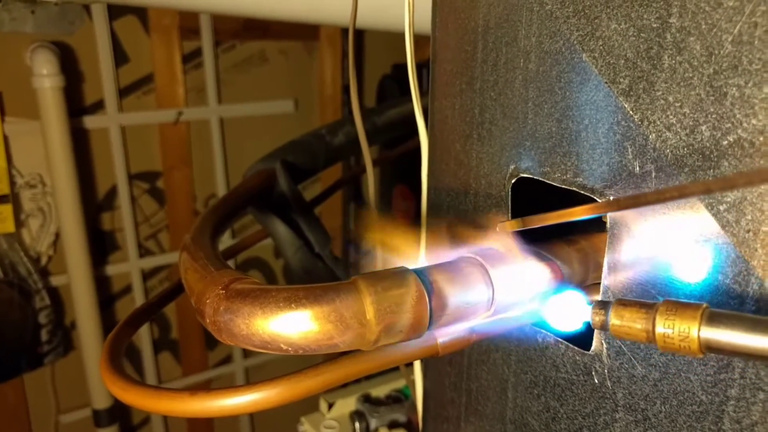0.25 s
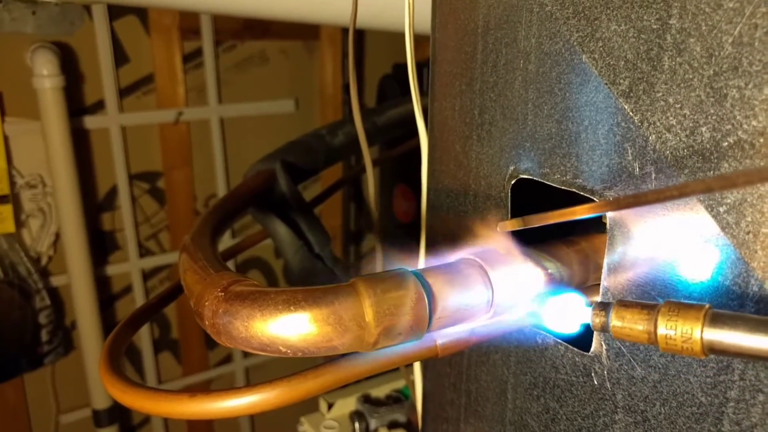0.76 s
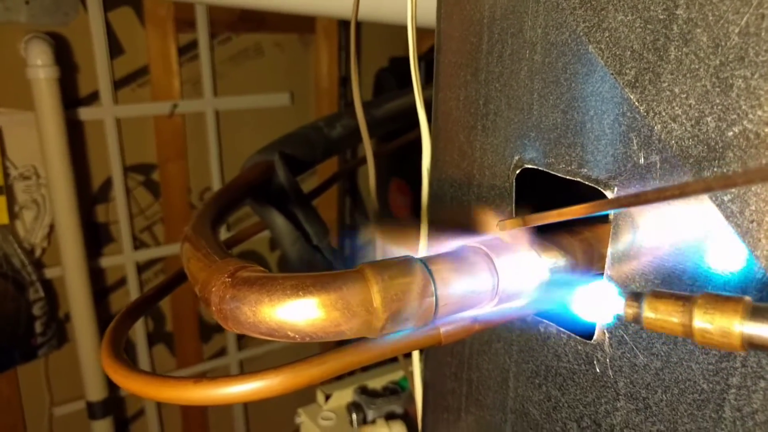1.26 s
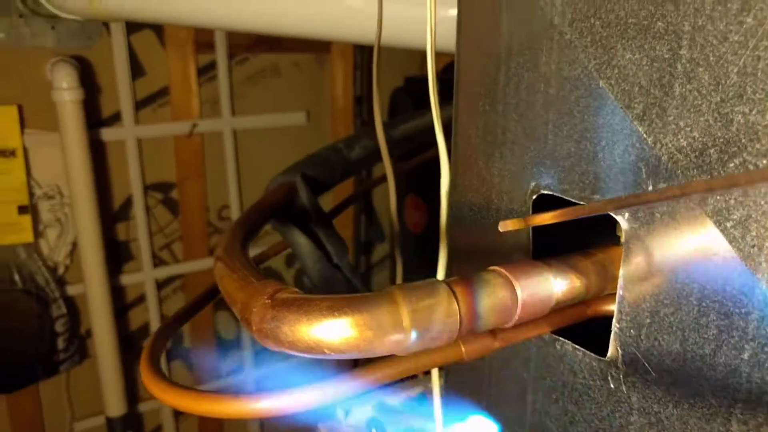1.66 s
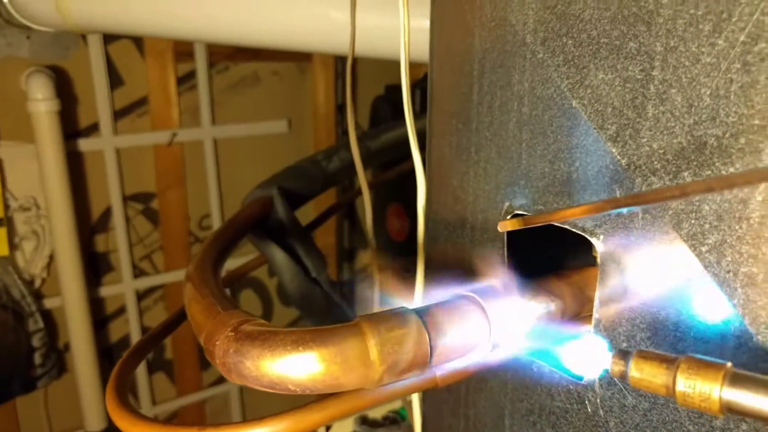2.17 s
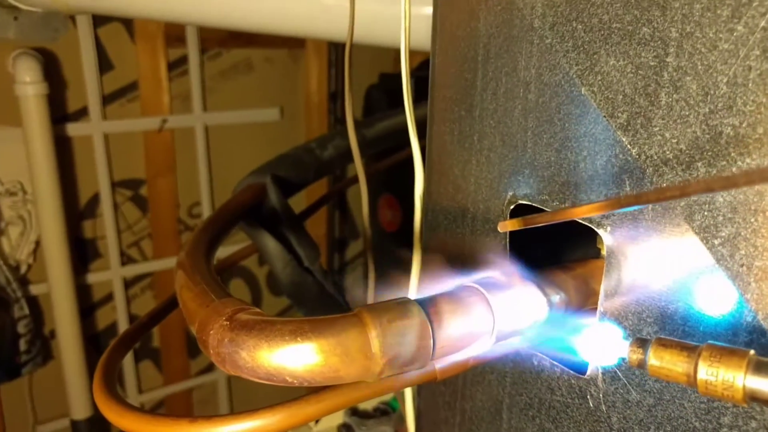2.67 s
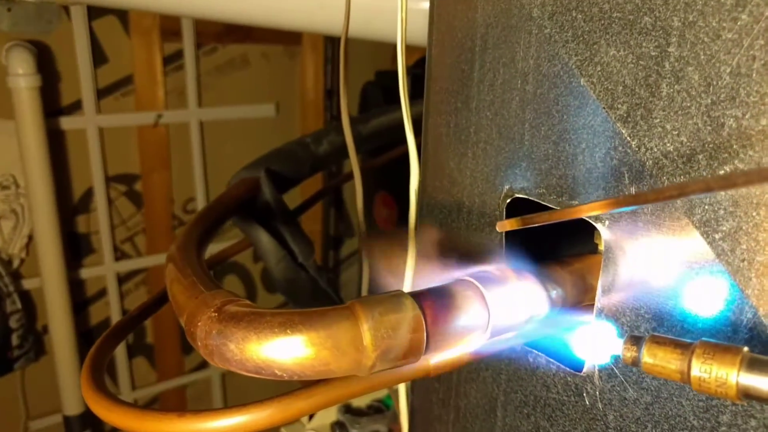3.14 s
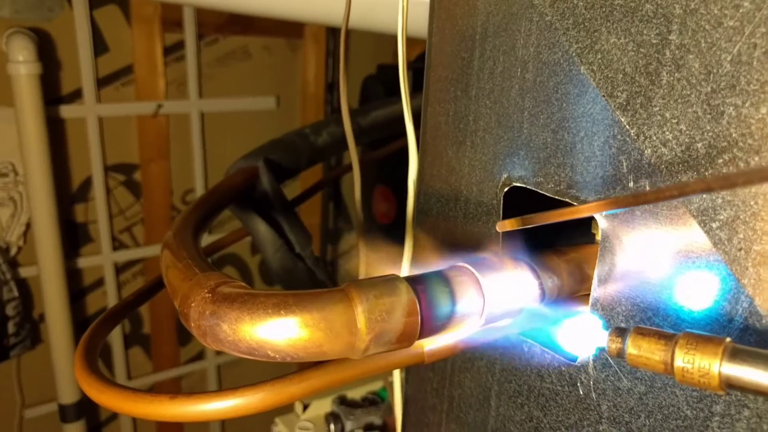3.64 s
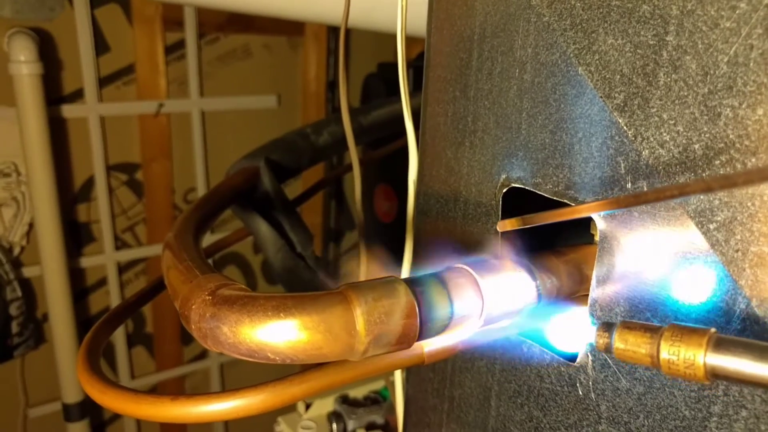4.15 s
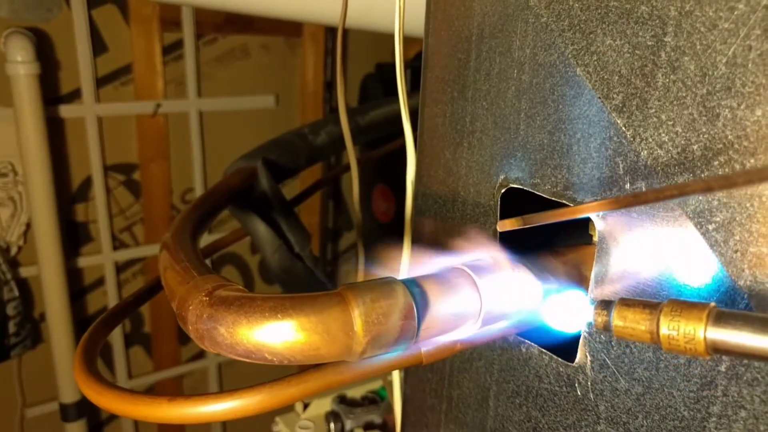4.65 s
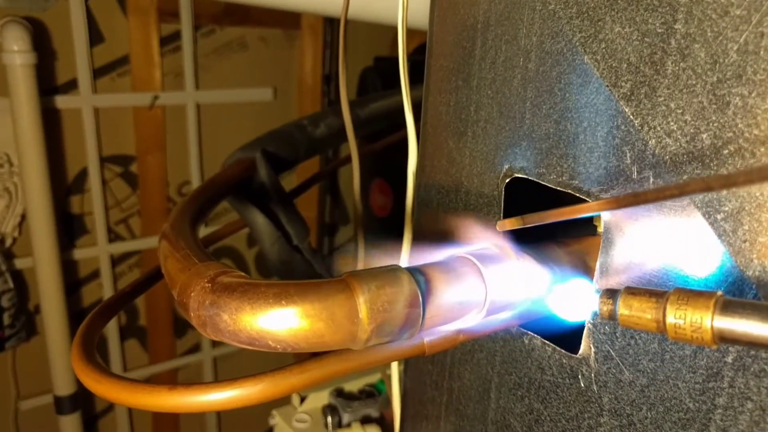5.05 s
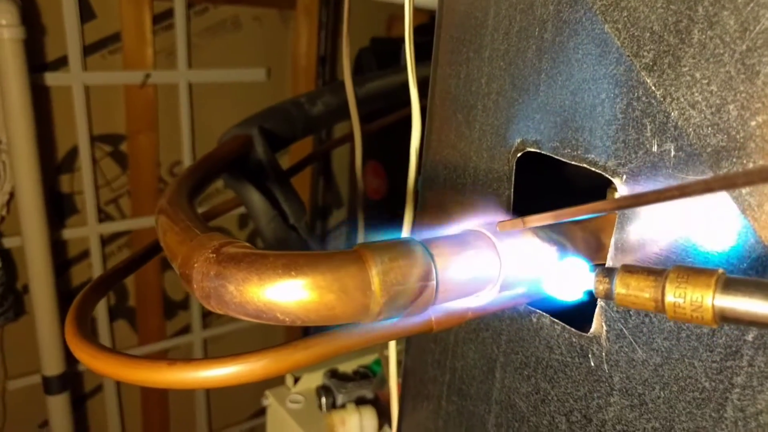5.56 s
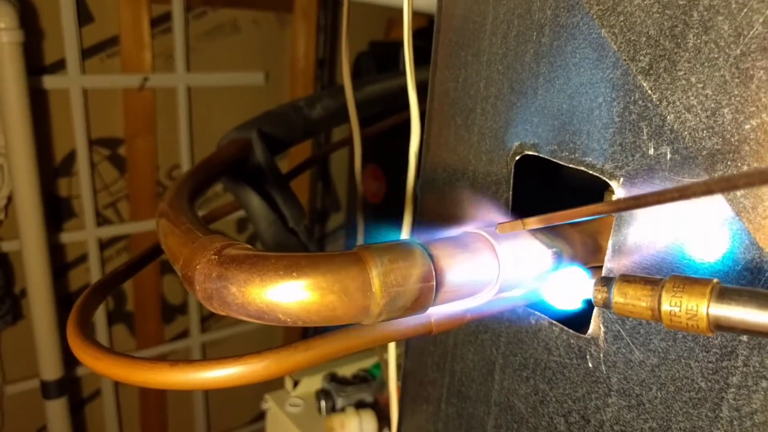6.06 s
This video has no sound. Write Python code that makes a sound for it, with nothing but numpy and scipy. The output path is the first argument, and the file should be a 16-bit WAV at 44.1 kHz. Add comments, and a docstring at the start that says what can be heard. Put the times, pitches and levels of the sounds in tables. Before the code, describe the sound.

A brazing torch burns against a copper pipe joint in front of a sheet-metal cabinet, heard close up with very little room echo. From the start, the gas jet gives a bright, steady hiss with a breathy high whistle that wavers slightly in pitch. A softer, hollow flame roar lies underneath and a thin sizzle sits on top. At about 1.4 seconds the torch swings away with a quick whoosh; the roar turns duller and the whistle briefly grows stronger. Near 1.9 seconds it whooshes back, and the movement sweeps a hollow, swirling tone through the hiss. The flame then stays on the joint. A few faint low puffs occur between about 1.5 and 5.7 seconds. The thin sizzle fades just after 5 seconds, while the hiss, whistle and roar carry on to the end at about 6.3 seconds.

```python
"""A brazing torch heats a copper joint in front of a sheet-metal cabinet, heard close up in mono.
From the start the gas jet hisses, its mixer whistles unsteadily and the flame roars on the pipe.
Near 1.4 s the torch swings away with a whoosh, near 1.9 s it whooshes back: the echoes off the metal
lengthen and shorten, sweeping hollows through the hiss. The flame then stays on the joint, with a few
soft low puffs, and a thin high sizzle fades out just after 5 s."""
import sys
import numpy as np
from scipy import signal
from scipy.fft import rfft, irfft, next_fast_len
from scipy.io import wavfile
from scipy.ndimage import uniform_filter1d, map_coordinates

SR = 44100
rng = np.random.default_rng(int(sys.argv[2]) if len(sys.argv) > 2 else 0)


def inscribe(sig):
    """Save sig as 16-bit PCM at rate SR to the path in sys.argv[1].

    A 1-D sig is mono; a 2-D sig holds one channel per row.
    Samples are clipped to [-1, 1] before scaling.
    """
    pcm = np.round(np.clip(np.atleast_2d(sig).T, -1, 1) * 32767)
    wavfile.write(sys.argv[1], SR, pcm.astype(np.int16))


N = 278271

# the room's decay: f/Hz, T60/s
ROOM_DECAY = [(200, 0.48), (2000, 0.071), (12000, 0.037)]
# the two nearest echoes as the torch moves: t/s, then delay/ms and relative strength of each
NEAR_ECHOES = [(0, 0.15, 0.32, .415, 0.18), (.8, 0.17, 0.49, 0.41, .2), (1.3, 0.17, 0.46, 0.4, 0.17),
               (1.35, .18, .42, .435, .28), (1.45, 0.25, .5, .48, 0.3), (1.55, 0.36, 0.3, 0.54, .22),
               (1.62, 0.4, 0.35, .6, 0.2), (1.74, 0.37, 0.24, 0.57, 0.2), (1.82, 0.28, 0.36, .52, .15),
               (1.88, 0.22, .42, .42, 0.3), (1.95, 0.18, 0.34, 0.43, 0.2), (2.08, .17, 0.2, 0.38, .24),
               (2.25, .15, 0.34, 0.38, 0.17), (3.3, 0.14, 0.31, .39, .07), (3.9, 0.15, 0.33, 0.43, 0.17),
               (4.5, .16, 0.49, 0.4, 0.2), (5.18, 0.16, 0.51, 0.41, 0.12), (5.3, 0.18, 0.64, 0.44, 0.3),
               (6.31, 0.18, 0.62, 0.45, 0.24)]
# farther echoes: delay before the swing/ms, delay after it/ms, change when away/ms, relative strength
FAR_ECHOES = [(.885, .58, .165, .1), (1.452, 1.452, -.17, .12), (1.81, 1.81, .15, .06)]
# soft low puffs: t/s, relative level/dB
LOW_PUFFS = [(1.489, -35), (2.359, -42), (3.108, -46), (3.449, -40), (3.79, -44), (4.749, -43),
             (5.718, -49)]
# resonances of the hollow cabinet: f/Hz, width/Hz, relative level/dB
CABINET_MODES = [(321, 100, -12), (400.4, 30.5, -6), (552, 18, -9.5), (640, 72, -7.5), (840, 380, -14.5),
                 (1060, 120, -8.5), (1423, 84, -7.5), (1530, 32, -18), (1657, 183, -7.5), (2000, 33, -14),
                 (2260, 23, -5), (3140, 148, 0.5)]
# tone colour of the flame: f/Hz, relative level/dB
FLAME_SPECTRUM = [(25, -31), (60, -13), (100, -9.5), (150, -13.5), (250, -4), (400, -2), (1000, 0),
                  (2000, 2.5), (3100, -3.5), (3600, -38)]
# envelope of the flame's roar: t/s, level/dB
ROAR_ENVELOPE = [(0, -28.5), (1.1, -29.5), (1.4, -26), (1.8, -29), (2, -27), (4, -28.5), (6.31, -30)]
# thin sizzle within the hiss: t/s, centre f/Hz, level/dB
SIZZLE_PATH = [(0, 9800, -28), (1.2, 9200, -39), (1.95, 10000, -38), (2.15, 10300, -30.5),
               (3.25, 10350, -27.5), (3.5, 10180, -33), (3.65, 9640, -28), (5, 9600, -36), (5.3, 9640, -55)]
# whooshes as the torch leaves and returns: peak t/s, level/dB, rise/(dB/s), fall/(dB/s)
WHOOSHES = [(1.43, -16, 160, 167), (1.88, -19.5, 140, 25)]
# the mixer's whistle: t/s, f/Hz, level/dB
WHISTLE_PATH = [(0, 2716, -17), (1.26, 2735, -20), (1.35, 2670, -18), (1.41, 2640, -30),
                (1.46, 2620, -16.5), (1.53, 2780, -14.5), (1.67, 2750, -17.5), (1.77, 2745, -13),
                (1.93, 2752, -24.5), (1.97, 2790, -20), (2.2, 2816, -18), (2.4, 2704, -19.5),
                (3.2, 2710, -18), (3.45, 2604, -18), (3.75, 2662, -17.5), (4.1, 2630, -18),
                (4.94, 2688, -19), (5.08, 2736, -17.5), (5.33, 2660, -20), (5.7, 2617, -19),
                (6.31, 2598, -20.5)]
# tone colour of the gas jet: f/Hz, relative level/dB
JET_SPECTRUM = [(1500, -35.5), (2000, -10), (2300, 4.5), (3100, 4), (3600, -3), (4150, 1.5), (5000, -2.5),
                (5500, 1), (5900, -0.5), (6800, 0), (8700, -5.5), (9100, -5.5), (11000, -8.5),
                (15000, -10.5), (15800, -8.5)]
# the hiss as the nozzle's aim changes: t/s, base level/dB, tilt/(dB/octave), amount of treble beam
NOZZLE_AIM = [(0, -14, 2.5, -1.5), (.8, -14, 2.5, -0.5), (1.15, -14.5, 0, 0), (1.3, -15.5, 1.5, 6),
              (1.42, -15, 1, 8), (1.6, -17, 0, 5), (1.84, -17.5, 0.8, 6), (1.97, -13.5, 3, -3),
              (2.15, -15, 2.5, 2), (2.4, -15.5, .5, 6.5), (3.2, -15.5, 1, 3.5), (3.7, -14.5, 2, 0),
              (4.5, -14.5, 0.5, 1.5), (5.15, -14.5, 0.9, -0.5), (5.6, -15, -0.2, 4.5),
              (6.31, -14.5, 0.8, 1)]

ON_PIPE_MS, OFF_PIPE_MS = 0.16, 0.36  # nearest echo's delay with the flame on and off the pipe
RETURN_START_S, RETURN_END_S = 1.75, 1.8  # the far echoes slide to their new delays
UPPER_ROAR_AWAY_DB, WHOOSH_TOP_HZ, BAND_LIMIT_HZ = -7.5, 4704, 15740


def amp(db):
    """Gain of a level in dB."""
    return 10 ** (np.asarray(db) / 20)


def unit(x):
    """x at rms 1."""
    return x / np.sqrt(np.mean(x ** 2) + 1e-20)


def along(points, hz):
    """Read (f/Hz, value) points at hz on a log axis."""
    f, v = np.transpose(points)
    return np.interp(np.log(hz + 1), np.log(f + 1), v)


def curves(rows):
    """One automation curve for each column after the time."""
    times, *columns = np.transpose(rows)
    return [np.interp(np.arange(N) / SR, times, column) for column in columns]


def wobble(rate):
    """A smooth random curve at rms 1, rate knots a second."""
    knots = rng.standard_normal(int(N * rate / SR) + 4)
    return unit(map_coordinates(knots, [np.arange(N) * rate / SR]))


def filtered(x, response):
    """x through an EQ curve, given as gain against frequency."""
    size = next_fast_len(N + SR // 2)
    return irfft(rfft(x, size) * response(np.fft.rfftfreq(size, 1 / SR)), size)[..., :N]


def delayed(x, ms):
    """x through a gliding delay."""
    return map_coordinates(x, [np.arange(N) - np.abs(ms) * SR / 1000], order=3, mode="mirror")


def noise_band(hz, db, rate):
    """Narrow noise around a gliding centre; a faster rate widens it."""
    band = wobble(rate) + 1j * wobble(rate)
    return amp(db) * unit((band * np.exp(2j * np.pi * np.cumsum(hz) / SR)).real)


def torch_swing():
    """How far the flame is off the pipe: about 0 on it, about 1 away."""
    return (curves(NEAR_ECHOES)[0] - ON_PIPE_MS) / (OFF_PIPE_MS - ON_PIPE_MS)


def room(x):
    """A short reverb in which the lows ring longest."""
    hz, t, noise = signal.stft(rng.standard_normal(SR // 2), SR, nperseg=256)
    tail = signal.istft(noise * amp(-60 * t / along(ROOM_DECAY, hz)[:, None]), SR, nperseg=256)[1]
    return signal.fftconvolve(np.pad(x, (220, 0)), tail / np.linalg.norm(tail))[:N]  # 5 ms pre-delay


def metal_echoes(x):
    """The direct sound plus duller copies off the metal: a comb filter that moves with the torch."""
    near_ms, near, second_ms, second = curves(NEAR_ECHOES)
    away = torch_swing()
    back = np.interp(np.arange(N) / SR, [RETURN_START_S, RETURN_END_S], [0, 1])
    paths = [(near_ms, near), (second_ms, second)]
    for before, after, change, strength in FAR_ECHOES:
        paths.append((before + (after - before) * back + change * away, strength))
    dull = filtered(x, lambda hz: 1 / (1 + (hz / 14000) ** 2))
    return x + 0.81 * sum(strength * delayed(dull, ms) for ms, strength in paths)


def puffs():
    """Each puff is one short swing of pressure at 75 Hz."""
    out, t = np.zeros(N + SR), np.arange(SR // 8) / SR
    puff = (t / 0.014) * np.exp(-t / 0.0096) * np.sin(2 * np.pi * 75 * t)
    for start, db in LOW_PUFFS:
        out[round(start * SR):][:len(t)] += amp(db + 9.5) * puff
    return out[:N]


def cabinet(hz):
    """Gain of the hollow cabinet: resonant peaks over a low floor."""
    top = max(db for _, _, db in CABINET_MODES)
    power = sum(amp(db - top) ** 2 / (1 + (2 * (hz - centre) / width) ** 2)
                for centre, width, db in CABINET_MODES)
    return np.sqrt(amp(-45) + power)


def flame_roar():
    """Burning gas roars against the pipe and drives the cabinet; off the pipe it sounds duller."""
    roar = unit(filtered(rng.standard_normal(N), lambda hz: amp(along(FLAME_SPECTRUM, hz)) * cabinet(hz)))
    low = filtered(roar, lambda hz: 1 / (1 + (hz / 750) ** 4))
    upper_db = UPPER_ROAR_AWAY_DB * np.clip(torch_swing(), 0, 1) ** 2
    db = curves(ROAR_ENVELOPE)[0] + 0.64 * wobble(5.655)
    return amp(db) * (low + amp(upper_db) * (roar - low))


def sizzle():
    """A thin band of noise drifting around 10 kHz."""
    return noise_band(*curves(SIZZLE_PATH), rate=600)


def whoosh():
    """The flame's edge crosses the pipe, at the pitch the nearest echo reinforces, up to a ceiling."""
    t = np.arange(N) / SR
    swells = [db - np.where(t < peak, rise * (peak - t), fall * (t - peak))
              for peak, db, rise, fall in WHOOSHES]
    hz = np.minimum(1000 / curves(NEAR_ECHOES)[0], WHOOSH_TOP_HZ)
    return noise_band(hz, np.max(swells, axis=0), rate=650)


def mixer_whistle():
    """A self-excited tone in the mixer: turbulence shakes its pitch and strength, making it breathy."""
    hz, db = curves(WHISTLE_PATH)
    shake = 30 * wobble(80) + 62 * wobble(350)
    # the mixer tube pulls the tone back to its own pitch, so slow drifts mostly cancel
    pitch = hz + shake - 0.8 * uniform_filter1d(shake, size=SR // 16)
    phasor = np.exp(2j * np.pi * np.cumsum(pitch) / SR)
    strength = 1 + 0.069 * (wobble(70) + 1j * wobble(70)) + 0.25 * (wobble(500) + 1j * wobble(500))
    tone = unit((strength * phasor).real)
    octave = amp(-18) * unit((strength * phasor ** 2).real)
    return amp(db) * (tone + octave)


def jet_hiss():
    """Broad turbulence hiss in faint random patches; its treble is a beam that turns with the nozzle."""
    db, brightness, beam = curves(NOZZLE_AIM)
    hz, t, noise = signal.stft(rng.standard_normal(N), SR, nperseg=512)
    patches = uniform_filter1d(rng.standard_normal(noise.shape), size=4, axis=0)  # smooth in frequency
    patches = uniform_filter1d(patches, size=20, axis=1)  # and in time
    frame = np.minimum(t * SR, N - 1).astype(int)
    tilt_db = np.clip(brightness[frame] * np.log2((hz[:, None] + 1) / 7000), -12, 12)
    beam_db = beam[frame] * along([(11000, 0.024), (12500, 0.71)], hz)[:, None]
    base_db = along(JET_SPECTRUM, hz)
    colour_db = base_db[:, None] + 1.5 * unit(patches) + tilt_db + beam_db
    shaped = noise * amp(colour_db) / np.sqrt(np.mean(amp(base_db) ** 2))
    return amp(db + 0.11 * wobble(8.3)) * signal.istft(shaped, SR, nperseg=512)[1][:N]


def scene():
    """Torch, metal and room, the same in both channels."""
    gas = mixer_whistle() + sizzle() + whoosh() + metal_echoes(jet_hiss())
    roar = metal_echoes(flame_roar())
    reverb = room(amp(-11) * gas + amp(-17.5) * roar)
    mix = gas + roar + reverb + puffs()
    return np.array([mix, mix])


def record(dry):
    """The input stage soft-clips the highest peaks; nothing passes above the band limit."""
    clipped = dry / (1 + np.abs(dry / 0.74) ** 8) ** (1 / 8)
    return filtered(clipped, lambda hz: hz < BAND_LIMIT_HZ)


dry = scene()
out = record(dry)
inscribe(out)
```